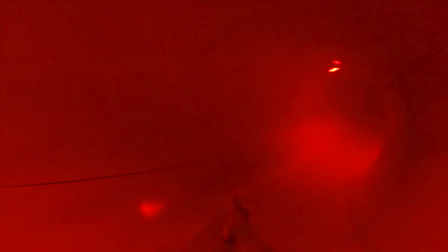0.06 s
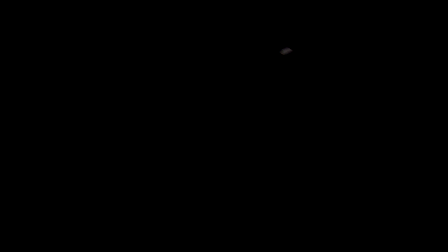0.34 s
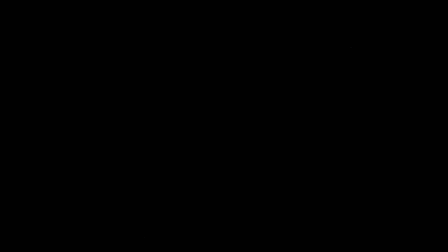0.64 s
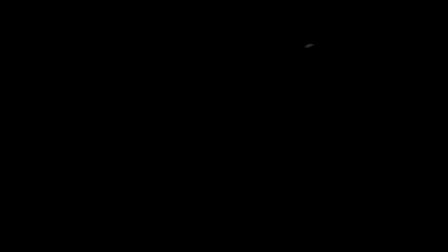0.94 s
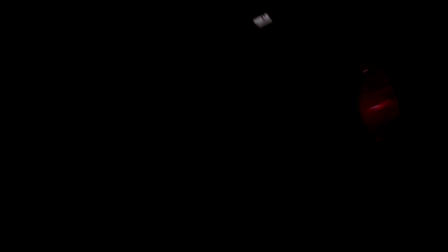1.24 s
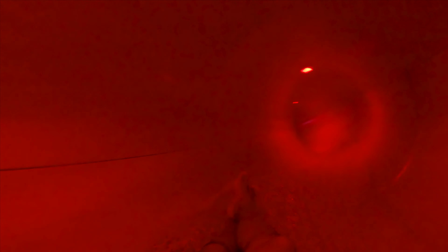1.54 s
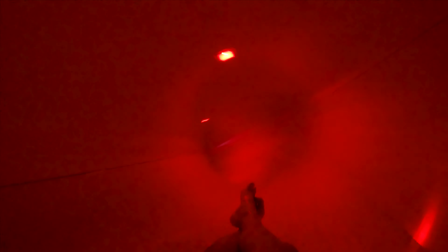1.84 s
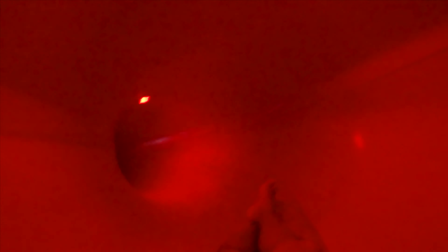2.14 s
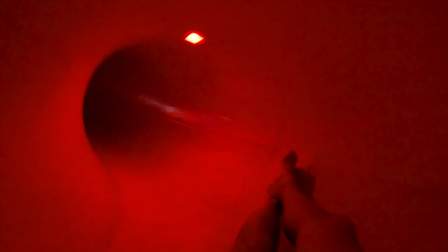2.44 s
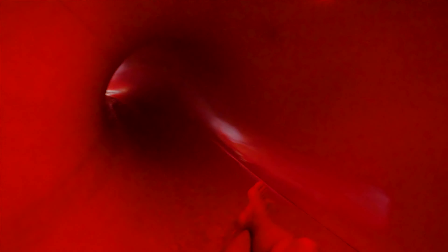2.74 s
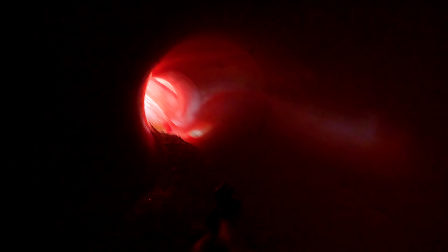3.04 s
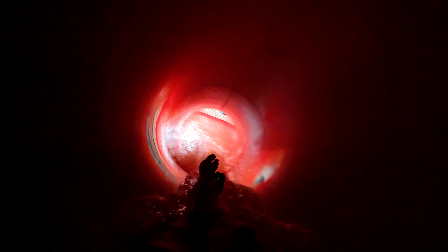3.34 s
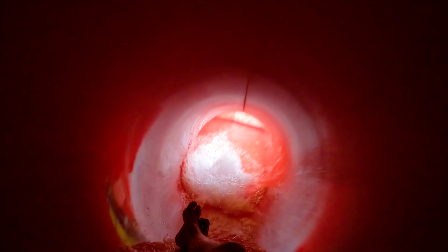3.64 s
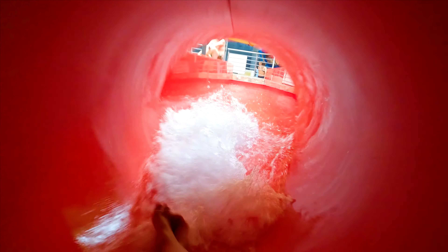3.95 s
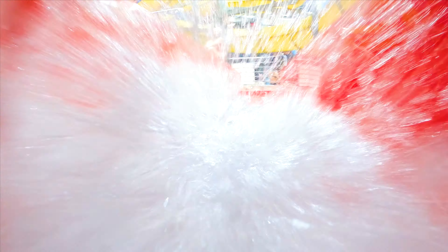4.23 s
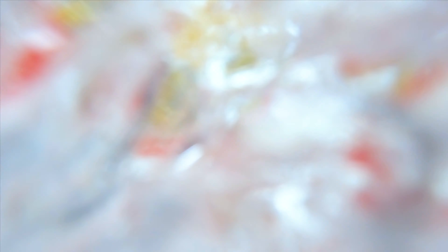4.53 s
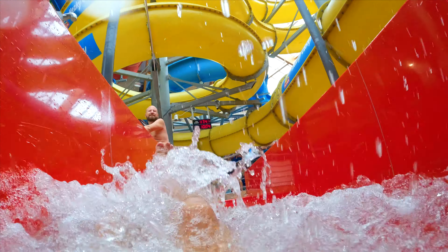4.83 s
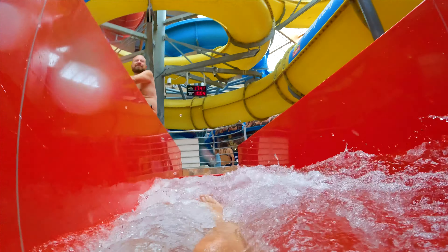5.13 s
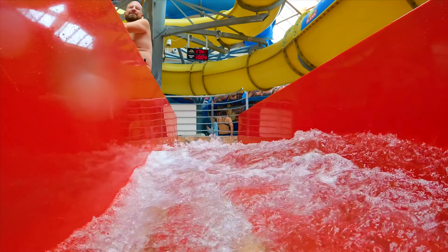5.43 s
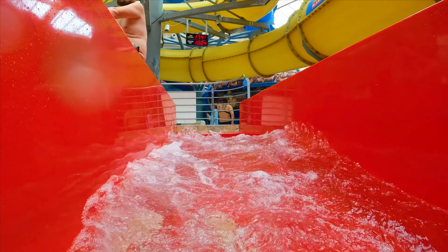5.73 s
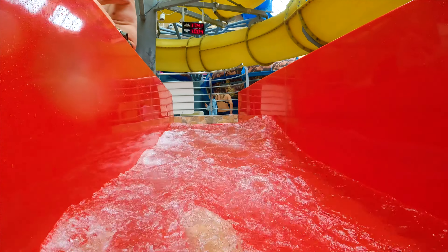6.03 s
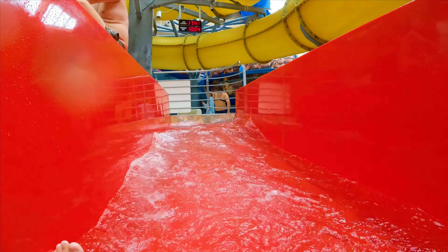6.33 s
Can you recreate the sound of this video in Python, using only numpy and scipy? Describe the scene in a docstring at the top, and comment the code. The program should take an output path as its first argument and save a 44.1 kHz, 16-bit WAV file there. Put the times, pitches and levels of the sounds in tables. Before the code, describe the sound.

Water roars hollowly inside a water slide tube, breaks into splashing and gurgling at the exit, then settles to a quieter rumble.

```python
"""Water roars in an enclosed water slide as a rider carries a camera down it in a waterproof case.
Countless collapsing bubbles make the tube ring, and slaps on the water draw hollow booms from it.
Air buffets the case and a thin hiss sits on the left. At the exit, spray rattles on the case while
trapped air gulps and bubbles ring. Then the case drifts along the run-out lane in a duller rumble,
with a few small laps of water."""
import sys
import numpy as np
from scipy import signal
from scipy.fft import rfft, irfft, next_fast_len
from scipy.io import wavfile
from scipy.ndimage import map_coordinates

SR = 44100
rng = np.random.default_rng(int(sys.argv[2]) if len(sys.argv) > 2 else 0)


def dump_mix(stems):
    """Bounce the given channels to the path in sys.argv[1] as a 16-bit WAV at rate SR."""
    frames = np.atleast_2d(stems).T  # one column per channel
    limited = np.clip(frames, -1, 1)  # hard clip at full scale
    pcm = np.round(limited * 32767).astype(np.int16)
    wavfile.write(sys.argv[1], SR, pcm)


N = 281358
TIME = np.arange(N) / SR
EXIT_S = 4.44  # the rider leaves the tube

# How strong each sound is from low to high pitch: pitch_hz, relative_level_db
FOAM_SPECTRUM = [(1000, -25), (2000, 2.5), (2900, -2), (3500, -8.5), (5500, -18.5), (8000, -33.5),
                 (15000, -50.5)]  # fizzing foam
HISS_SPECTRUM = [(10000, -70), (10900, -30), (11900, -6), (12600, 0), (13200, -2), (14100, -10),
                 (15800, -11.5)]  # very high hiss
LANE_SPECTRUM = [(250, -13.5), (430, -1), (600, 3), (850, -5.5), (1150, -12.5), (1450, -25), (2000, -35),
                 (3000, -54.5), (3600, -64.5), (5500, -76)]  # open water in the run-out lane
SPRAY_SPECTRUM = [(300, -27.5), (800, 12.5), (1700, 5.5), (2400, -3), (3100, -13.5), (3700, -15.5),
                  (5600, -23), (8000, -41), (15000, -51.5)]  # droplets hitting the case
CHURN_SPECTRUM = [(30, -12.5), (45, 2.5), (70, -1.5), (120, 0), (200, 0.5), (292, -4), (340, -3.5),
                  (430, -2), (650, -7.5), (1000, -26.5), (2000, -90)]  # stirred-up water
BUFFET_SPECTRUM = [(5, -10), (16, 0), (30, 0), (46, -3.5), (62, -9), (100, -8), (150, -16), (300, -35),
                   (800, -75)]  # air or waves pushing on the case
ROAR_SPECTRUM = [(250, -15.5), (450, -3.5), (650, -3), (870, -2), (1150, -9), (1500, -19.5), (2000, -26),
                 (2800, -36), (3250, -44.5), (4000, -47.5), (4700, -53.5), (5500, -56), (7500, -75.5),
                 (10000, -95)]  # water rushing along the tube

# The pitches at which each object likes to ring: pitch_hz, width_hz, boost_db
LANE_RESONANCES = [(165, 40, 3), (425, 40, 3.5), (735, 40, 3)]  # the open trough
CASE_RESONANCES = [(1700, 110, 2), (2320, 160, 4), (2610, 70, 4), (2720, 90, 9), (2900, 110, 8),
                   (3075, 50, 14), (3210, 60, 11.5), (3590, 90, 10), (3860, 200, 7.5), (4460, 200, 7),
                   (4850, 140, 5.5)]  # the plastic case
TUBE_RESONANCES = [(212, 60, 4), (350, 22, 9.5), (418, 50, 3.5), (495, 30, 1.5), (660, 24, 7), (735, 50, 2),
                   (830, 42, 6), (945, 50, 1.5), (1110, 50, 1.5), (1270, 120, 1.5)]  # the air across the tube

# How each sound grows and fades during the ride: time_s, relative_level_db
FOAM_LEVELS = [(4.4, -74.5), (4.95, -68.5), (5.2, -71), (5.85, -74.5), (6.08, -67.5), (6.33, -64)]  # foam in the run-out lane
HISS_LEVELS = [(0.05, -49.5), (0.26, -51.5), (2.7, -47.5), (3.23, -48.5), (3.29, -45), (4.19, -42),
               (4.3, -43)]  # thin hiss, growing with the pace
CHURN_LEVELS = [(0.05, -25), (0.75, -27.5), (1.3, -25.5), (1.95, -24), (2.5, -26.5), (3.25, -25.5),
                (3.35, -21), (4.3, -18)]  # water churned by the rider, most in the deep last stretch
AIR_LEVELS = [(0.05, -19), (0.76, -23.5), (0.84, -22), (1.56, -25), (2.1, -19.5), (2.31, -21.5),
              (2.52, -27.5), (2.69, -19.5), (2.76, -25), (3.6, -24), (4.4, -20.5)]  # air buffeting the case
ROAR_LEVELS = [(0.05, -24.5), (0.53, -27.5), (2.07, -24.5), (2.42, -26), (3.3, -24.5), (4.25, -22.5),
               (4.29, -20), (4.4, -24)]  # water roaring along the tube

# Sharp spits in the thin hiss: peak_s, level_db
HISS_SPITS = [(4.3385, -25), (4.3420, -16), (4.3525, -19.5)]
# Single drops landing on the case: start_s, relative_level_db
DROP_HITS = [(4.463, -22), (4.485, -23.5), (4.4995, -26), (4.517, -25.5), (4.558, -25.5), (4.698, -32),
             (4.7155, -29.5), (4.858, -35.5)]
# Sheets of spray on the case: peak_s, spread_s, level_db, tilt_db_per_octave
SPRAY_SHEETS = [(3.31, 0.041, -33.5, -7.5), (3.63, .012, -46, -5), (3.76, 0.037, -41, -3.5),
                (4.118, .012, -38, -3.5), (4.174, .02, -33.5, -5.5), (4.270, 0.0029, -28, -3.5),
                (4.341, 0.0045, -30, 3), (4.405, 0.0015, -19, 6.5), (4.41, 0.015, -35, 4),
                (4.445, .014, -33, 0), (4.467, 0.0074, -34, 3.5), (4.486, 0.0034, -23.5, 0),
                (4.5, 0.0035, -22, 0.5), (4.513, 0.005, -37, 4), (4.533, 0.0043, -27, -1.5),
                (4.545, 0.0046, -29, 0.5), (4.559, 0.0091, -31, -3.5), (4.585, 0.0092, -36, -5.5),
                (4.606, .008, -37.5, -3), (4.627, 0.0027, -38.5, -3), (4.637, .002, -45, -2),
                (4.655, 0.011, -42, -7), (4.692, 0.013, -33.5, -5), (4.699, 0.0016, -31.5, 1.5),
                (4.716, .0009, -31, -3), (4.736, 0.0069, -45.5, -0.5), (4.765, .001, -43.5, -3),
                (4.827, 0.011, -40, -4), (4.848, .004, -44, -1), (4.858, 0.0016, -41, 5),
                (4.872, .004, -58, 6), (4.916, .002, -51, -1)]
# Bubbles ringing as water closes over the case: peak_s, spread_s, level_db, pitch_hz
BUBBLE_RINGS = [(4.363, .009, -14, 87.7), (4.397, .008, -13.5, 101.7), (4.397, .003, -29, 2850),
                (4.405, .003, -31, 2260), (4.426, 0.0062, -30, 2750), (4.444, 0.0076, -14.5, 750),
                (4.444, 0.012, -35.5, 1810), (4.454, 0.003, -15, 665), (4.463, 0.0025, -25, 1455),
                (4.468, 0.0046, -17, 892), (4.476, 0.0085, -9.5, 87.4), (4.485, 0.0057, -23.5, 1170),
                (4.488, 0.0055, -25, 1463), (4.489, 0.0043, -12, 256), (4.497, 0.0085, -13, 74.5),
                (4.502, 0.0037, -28, 1820), (4.518, 0.003, -28, 1734), (4.535, 0.0081, -13, 187.3),
                (4.535, .004, -36, 1500), (4.545, .004, -32, 1810), (4.555, 0.0084, -15.5, 74.5),
                (4.558, 0.004, -40, 2810), (4.564, 0.0044, -11.5, 174.2), (4.572, 0.0056, -15, 490),
                (4.579, 0.0051, -15, 381), (4.593, 0.0059, -17, 129), (4.627, 0.0068, -13, 177.8),
                (4.632, 0.0069, -15, 87.7), (4.688, .008, -19, 88.6), (4.699, 0.0021, -30.5, 1383),
                (4.711, 0.0073, -16, 116.3), (4.752, 0.0069, -15, 102.2), (4.786, 0.0015, -49, 2080),
                (4.830, .003, -46.5, 2770), (4.83, 0.017, -20.5, 59.7), (4.845, .005, -18.5, 284),
                (4.857, .0025, -40, 1418), (4.865, 0.0062, -16, 226), (4.878, 0.012, -20.5, 101.6),
                (4.949, .009, -18.5, 102.7)]
# Rough gulps of trapped air, then (from 5.265 s) small laps of water in the run-out lane:
# peak_s, spread_s, level_db, pitch_hz, sharpness (higher is purer)
GULPS_AND_LAPS = [(1.622, .003, -27, 700, 1.1), (3.36, .025, -22.5, 110, 0.95),
                  (3.745, 0.0047, -19, 650, 1.6), (4.408, 0.011, -27.5, 2740, 4.3),
                  (4.464, 0.0039, -13, 257, 0.61), (4.465, .003, -19, 750, 1),
                  (4.483, 0.0025, -8.5, 308, 0.96), (4.485, 0.0042, -23.5, 1200, 1.6),
                  (4.51, 0.011, -28.5, 1710, 4.1), (4.55, .014, -37, 2500, 3.5),
                  (4.61, 0.0253, -46.5, 2420, 2.3), (4.52, 0.0018, -11, 478, 0.61),
                  (4.572, 0.01, -18.5, 466, 1.3), (4.608, 0.012, -24, 554, 2.2),
                  (4.656, .012, -25.5, 110, .7), (4.702, .006, -20, 258, 1.4),
                  (4.737, .005, -17.5, 352, 0.56), (4.754, 0.0038, -13.5, 370, 0.62),
                  (4.765, 0.0017, -18, 713, 3.4), (4.794, 0.0017, -12, 260, 0.85),
                  (4.86, 0.013, -17.5, 370, 1.36), (4.884, 0.007, -16.5, 300, 0.71),
                  (4.922, 0.0048, -18, 320, 1.3), (4.949, 0.0089, -17, 268, 0.57),
                  (5.265, 0.016, -31.5, 543, 1.3), (5.482, .003, -32, 620, 1.8),
                  (5.651, 0.0025, -39, 600, 1.5), (5.878, 0.0031, -33, 624, 1.5)]
# Hollow notes of the tube as the rider slaps the water: peak_s, spread_s, level_db, pitch_hz
TUBE_BOOMS = [(1.261, 0.017, -24, 654), (1.317, 0.01, -25, 148.3), (1.953, .014, -22.5, 174.6),
              (2.012, 0.014, -23, 654), (2.82, .016, -23, 354), (3.345, 0.011, -19.5, 342),
              (3.381, .01, -15, 352), (3.428, 0.0095, -15, 222), (3.43, .022, -23, 352),
              (3.535, 0.012, -21.5, 402), (3.728, 0.013, -23, 330), (3.868, 0.0094, -24.5, 678),
              (3.912, 0.02, -18.5, 342)]


def from_db(db):
    """Turn decibels into a number to multiply by."""
    return 10 ** (np.asarray(db) / 20)


def rms_one(x):
    """Scale a sound so that its average strength (rms) is 1."""
    return x / np.sqrt(np.mean(x ** 2) + 1e-20)


def level_curve(rows):
    """Join the points of a level table with straight lines, giving decibels at every sample."""
    time_s, level_db = np.transpose(rows)
    return np.interp(TIME, time_s, level_db)


def drift(rate_hz):
    """A slow random wander around zero."""
    points = rng.standard_normal(int(N / SR * 2 * rate_hz) + 2)
    return np.interp(TIME * 2 * rate_hz, np.arange(len(points)), points)


def colour(x, spectrum, resonances=(), tilt_db=0):
    """Filter a sound by a spectrum and its resonances; tilt_db per octave makes it brighter or duller."""
    size = 2 * next_fast_len(len(x) // 2 + 1)
    bin_hz = np.maximum(np.fft.rfftfreq(size, 1 / SR), 1)
    hz, db = np.transpose(spectrum)
    level_db = np.interp(np.log(bin_hz), np.log(hz), db)
    level_db += tilt_db * np.log2(np.clip(bin_hz, hz[0], hz[-1]) / hz[0])
    level_db -= 30 * np.log2(np.maximum(bin_hz / hz[-1], 1))  # keep falling past the last point
    for pitch_hz, width_hz, boost_db in resonances:
        level_db += boost_db / (1 + (2 * (bin_hz - pitch_hz) / width_hz) ** 2)
    # make the ringing come after each hit, never before it (a minimum-phase filter)
    cepstrum = irfft(np.log(from_db(level_db)))[:size // 2]
    cepstrum[1:] *= 2
    response = np.exp(rfft(cepstrum, size))
    return irfft(rfft(x, size) * response)[:len(x)]


def patter(per_s, scatter_db, size):
    """Tiny hits at random times, most of them weak, a few strong."""
    strength = from_db(scatter_db * np.minimum(rng.exponential(1, size), 4))
    sign = rng.choice([-1, 1], size)
    is_hit = rng.random(size) < per_s / SR
    return rms_one(strength * sign * is_hit)


def flow(spectrum, resonances=(), per_s=9000, surge_db=1.0, surge_hz=12):
    """Countless tiny pops, such as collapsing bubbles, blend into a surging rush."""
    pops = patter(per_s, scatter_db=2.23, size=N) * from_db(surge_db * drift(surge_hz))
    return rms_one(colour(pops, spectrum, resonances))


def swell(spread_s):
    """A bell-shaped rise and fall in the middle of a quarter second."""
    t = np.arange(SR // 4) / SR
    return np.exp(-.5 * ((t - t.mean()) / spread_s) ** 2)


def add(out, burst, peak_s, level_db, shape):
    """Mix in a burst centred on peak_s, reaching about level_db at the top of its swell."""
    start = int(peak_s * SR) - len(burst) // 2
    out[start:start + len(burst)] += from_db(level_db) * rms_one(burst) * np.sqrt(np.mean(shape ** 2))


def tone(shape, pitch_hz, wander_octaves, flutter_db, wobble_cycles, rise_octaves_per_s=0):
    """One swell of a nearly pure note, whose pitch and strength wobble once every wobble_cycles."""
    samples = np.arange(len(shape))
    from_peak_s = (samples - len(shape) / 2) / SR
    wobbles = samples / SR * pitch_hz / wobble_cycles
    wander, flutter = (np.interp(wobbles, np.arange(800), row) for row in rng.standard_normal((2, 800)))
    hz = pitch_hz * 2 ** (rise_octaves_per_s * from_peak_s + wander_octaves * wander)
    cycles = np.cumsum(hz) / SR + rng.random()
    return shape * from_db(flutter_db * flutter) * np.sin(2 * np.pi * cycles)


def foam():
    """Foam fizzes faintly on the open water of the run-out lane."""
    return from_db(level_curve(FOAM_LEVELS)) * flow(FOAM_SPECTRUM, per_s=8100, surge_db=1.5, surge_hz=16)


def thin_hiss(covered_s=4.405):
    """A very high hiss grows with speed, spits, and stops once water covers the case."""
    fade_db = -900 * np.clip(TIME - covered_s, 0, .5)
    gain = from_db(level_curve(HISS_LEVELS) + fade_db)
    out = gain * flow(HISS_SPECTRUM, per_s=28000, surge_db=0.9, surge_hz=40)
    shape = swell(spread_s=.0007)
    for peak_s, level_db in HISS_SPITS:
        spit = colour(shape * rng.standard_normal(len(shape)), HISS_SPECTRUM, tilt_db=30.5)
        add(out, spit, peak_s, level_db, shape)
    return out


def lane_gain(wake_db, wash_db, wake_fades_s=5.067, wash_full_s=6.133):
    """The rider's wake dies away while the wash from the tube builds up; their powers add."""
    wake = from_db(wake_db - 31 * np.maximum(TIME - wake_fades_s, 0))
    wash = from_db(wash_db - 14.5 * np.maximum(wash_full_s - TIME, 0))
    return np.hypot(wake, wash)


def lane():
    """Open water after the exit roars dully and churns, and its waves rock the case."""
    roar = flow(LANE_SPECTRUM, LANE_RESONANCES, per_s=8800, surge_db=0.5, surge_hz=19)
    roar *= lane_gain(wake_db=-36.5, wash_db=-27.5)
    churn = lane_gain(wake_db=-27.5, wash_db=-27.5) * flow(CHURN_SPECTRUM, per_s=2000)
    rocking = lane_gain(wake_db=-24.5, wash_db=-30.5) * flow(BUFFET_SPECTRUM)
    fade_in = from_db(-200 * np.clip(EXIT_S - TIME, 0, 1))
    return (roar + churn + rocking) * fade_in


def drops(boost_db=7):
    """Lone drops tick on the case and make its plastic ring."""
    clicks = np.zeros(N)
    for start_s, level_db in DROP_HITS:
        clicks[int(start_s * SR)] = from_db(level_db)
    ticks = colour(clicks, SPRAY_SPECTRUM, CASE_RESONANCES, tilt_db=-1)
    return from_db(boost_db) * ticks * clicks.max() / np.abs(ticks).max()


def spray():
    """Sheets of droplets rattle on the case; fine, fast spray is brighter than a slap."""
    out = np.zeros(N)
    for peak_s, spread_s, level_db, tilt_db in SPRAY_SHEETS:
        shape = swell(spread_s)
        droplets = shape * patter(per_s=9000, scatter_db=5.5, size=len(shape))
        add(out, colour(droplets, SPRAY_SPECTRUM, CASE_RESONANCES, tilt_db), peak_s, level_db, shape)
    return out


def bubbles():
    """Single bubbles ring against the case and rise in pitch: large ones glug, small ones chirp."""
    out = np.zeros(N)
    for peak_s, spread_s, level_db, pitch_hz in BUBBLE_RINGS:
        shape = swell(spread_s)
        ring = tone(shape, pitch_hz, wander_octaves=.07, flutter_db=3, wobble_cycles=3,
                    rise_octaves_per_s=2.5)
        add(out, ring, peak_s, level_db, shape)
    return out


def rough_ring(pitch_hz, sharpness, pitch_ratio):
    """Small jolts keep a rough note ringing; the pitch_ratio curve bends it."""
    jolts = patter(per_s=1100, scatter_db=1.8, size=3 * len(pitch_ratio))
    b, a = signal.iirpeak(pitch_hz, sharpness, fs=SR)
    ring = signal.lfilter(b, a, signal.lfilter(b, a, jolts))
    ring = signal.sosfilt(signal.butter(4, 2 * pitch_hz, fs=SR, output="sos"), ring)
    return map_coordinates(ring, [np.cumsum(pitch_ratio)], order=3)


def gulps_and_laps(pitch_bend=0.06, small_count=8, small_span_s=0.38):
    """Rough gulps of trapped air, then small laps of water in the run-out lane; each rises in pitch."""
    out, small_gulps = np.zeros(N), []
    # small extra gulps come at random after the plunge, ever weaker
    for k, (time_chance, pitch_chance) in enumerate(rng.random((small_count, 2))):
        delay_s = small_span_s * (k + time_chance) / small_count
        level_db = -20.5 - 4 * delay_s
        pitch_hz = 130 * 2 ** (2 * pitch_chance - 1)
        small_gulps.append((EXIT_S + delay_s, 0.01, level_db, pitch_hz, 2.6))
    for peak_s, spread_s, level_db, pitch_hz, sharpness in GULPS_AND_LAPS + small_gulps:
        shape = swell(spread_s)
        pitch_ratio = 1 + pitch_bend * (2 * np.cumsum(shape) / shape.sum() - 1)
        add(out, shape * rough_ring(pitch_hz, sharpness, pitch_ratio), peak_s, level_db, shape)
    return out


def booms():
    """The tube answers the rider's hardest slaps on the water with a short hollow note."""
    out = np.zeros(N)
    for peak_s, spread_s, level_db, pitch_hz in TUBE_BOOMS:
        shape = swell(spread_s)
        note = tone(shape, pitch_hz, wander_octaves=0.016, flutter_db=2.0, wobble_cycles=2.1)
        add(out, note, peak_s, level_db, shape)
    return out


def through_bends(x, waver=.007, bends_per_s=2.5):
    """The tube's ringing wavers a little in pitch as the rider swings through the bends."""
    read_position = np.cumsum(1 + waver * drift(bends_per_s))
    return map_coordinates(x, [read_position], order=3, mode="mirror")


def tube():
    """Rushing, churning water makes the tube ring and air buffets the case; all fade at the exit."""
    rush = flow(ROAR_SPECTRUM, TUBE_RESONANCES, surge_db=0.5, surge_hz=14)
    roar = through_bends(rush) * from_db(level_curve(ROAR_LEVELS) + 1)
    churn = flow(CHURN_SPECTRUM, TUBE_RESONANCES, per_s=2500, surge_db=-0.5, surge_hz=11)
    churn *= from_db(level_curve(CHURN_LEVELS))
    buffet = flow(BUFFET_SPECTRUM, surge_db=2.5, surge_hz=2.6) * from_db(level_curve(AIR_LEVELS) + 2)
    fade_out = from_db(-170 * np.maximum(TIME - EXIT_S, 0))
    return (roar + churn + buffet) * fade_out


def scene():
    """The case passes the water's sound equally to both sides; the thin hiss is only on the left."""
    water = tube() + booms() + lane() + foam() + spray() + drops() + gulps_and_laps() + bubbles()
    return np.array([water + thin_hiss(), water])


def record(dry):
    """Round off the largest peaks and cut the very highest treble."""
    knee, headroom, cutoff_hz = .6, .25, 15750
    excess = np.maximum(np.abs(dry) - knee, 0)
    rounded = np.clip(dry, -knee, knee) + np.sign(dry) * headroom * np.tanh(excess / headroom)
    return signal.sosfilt(signal.ellip(12, .1, 90, cutoff_hz, fs=SR, output="sos"), rounded)


dry = scene()
out = record(dry)
dump_mix(out)
```